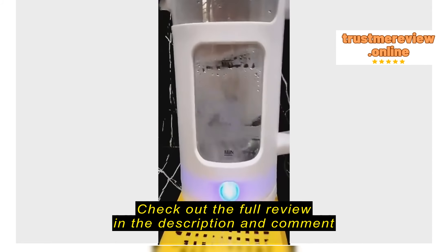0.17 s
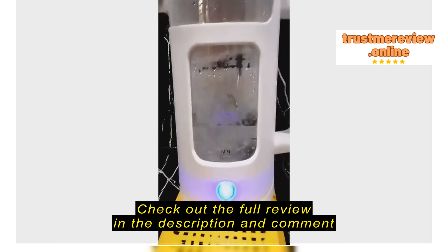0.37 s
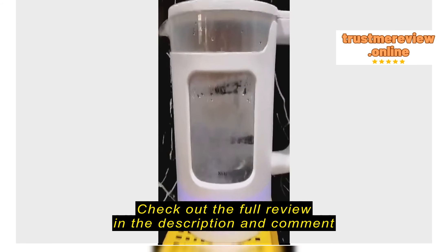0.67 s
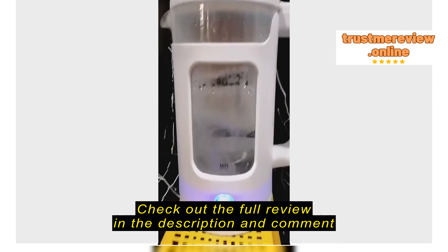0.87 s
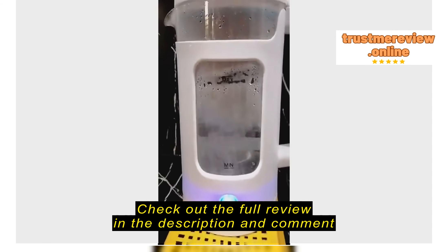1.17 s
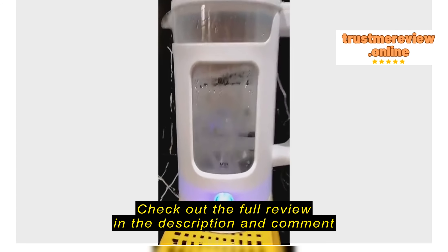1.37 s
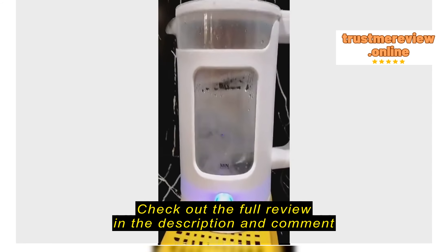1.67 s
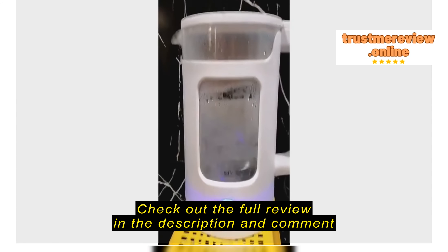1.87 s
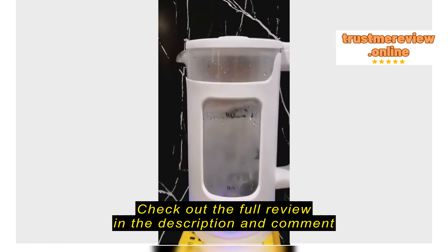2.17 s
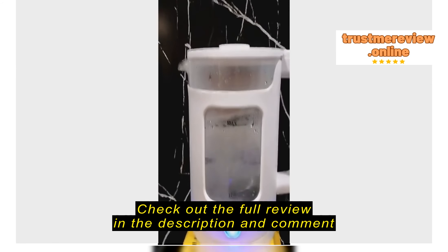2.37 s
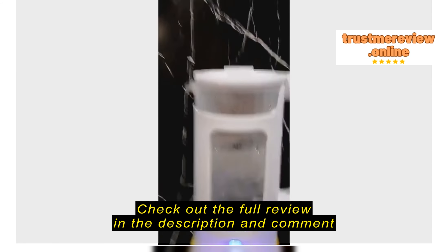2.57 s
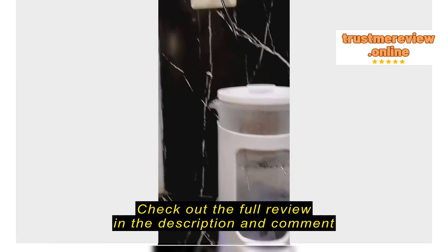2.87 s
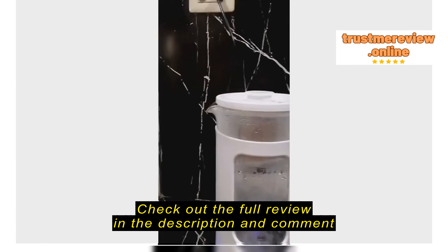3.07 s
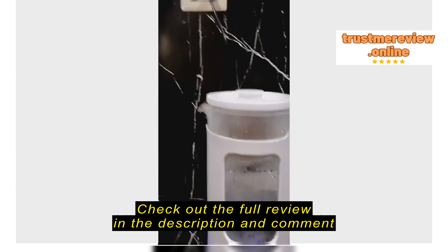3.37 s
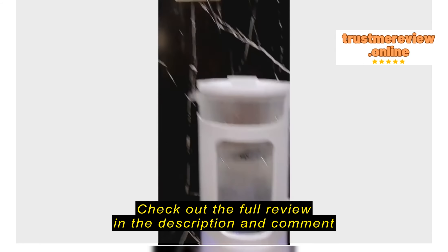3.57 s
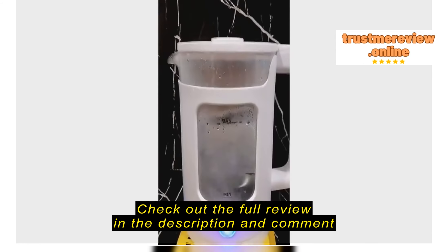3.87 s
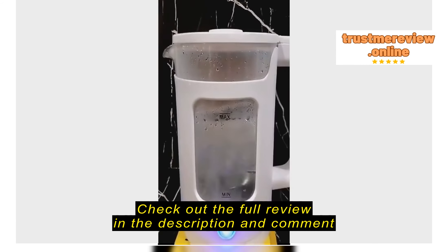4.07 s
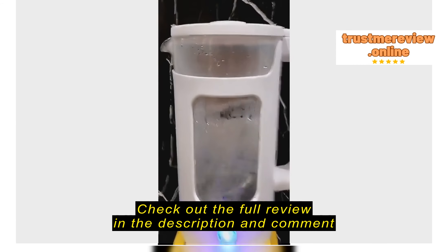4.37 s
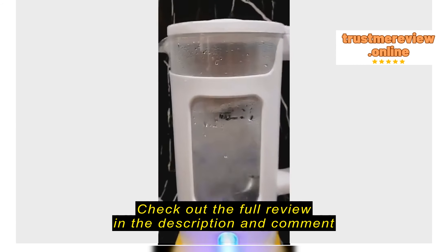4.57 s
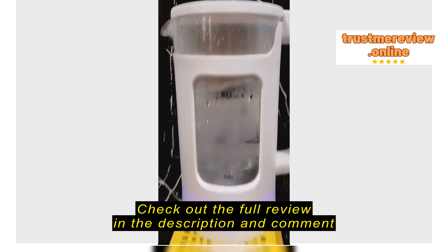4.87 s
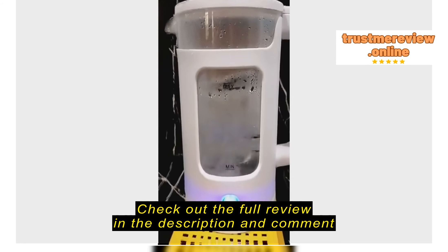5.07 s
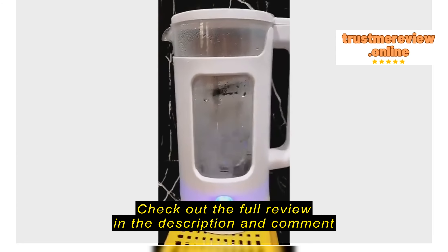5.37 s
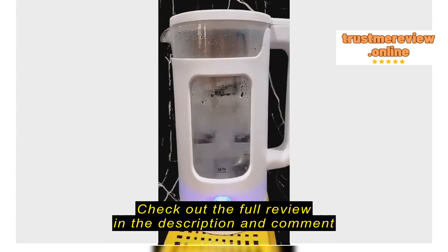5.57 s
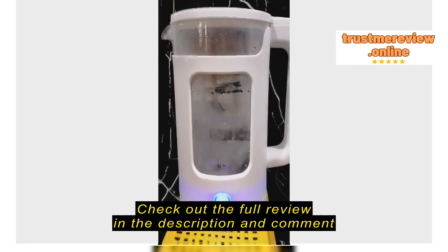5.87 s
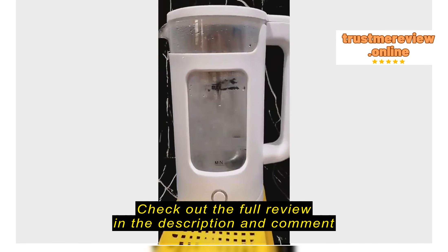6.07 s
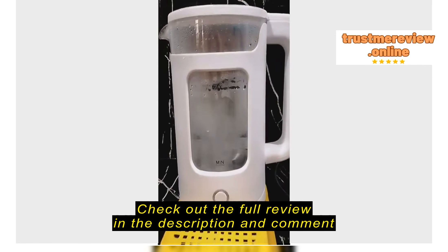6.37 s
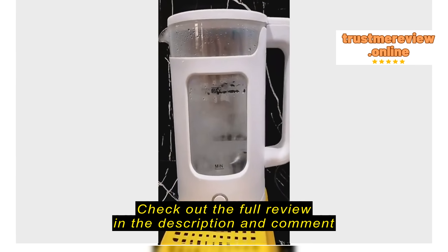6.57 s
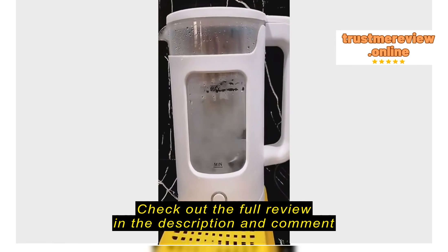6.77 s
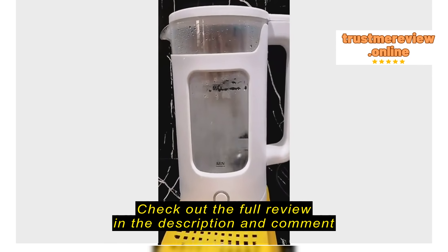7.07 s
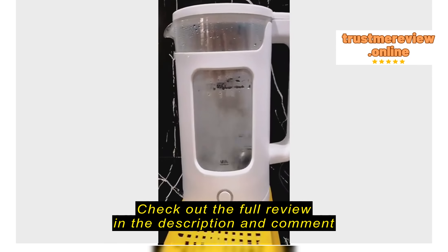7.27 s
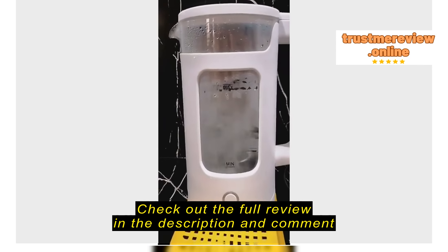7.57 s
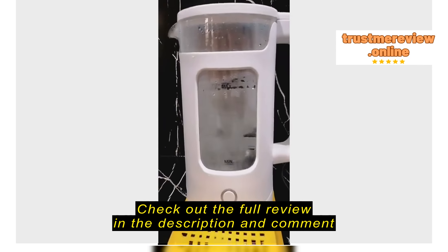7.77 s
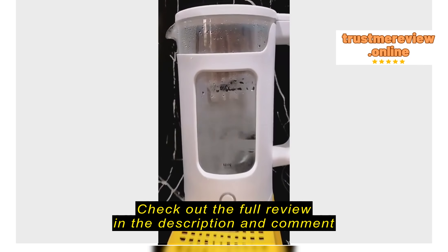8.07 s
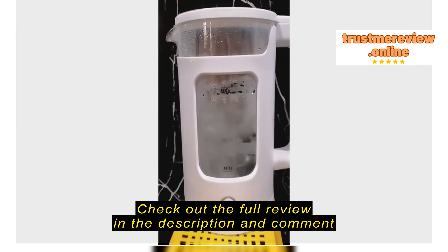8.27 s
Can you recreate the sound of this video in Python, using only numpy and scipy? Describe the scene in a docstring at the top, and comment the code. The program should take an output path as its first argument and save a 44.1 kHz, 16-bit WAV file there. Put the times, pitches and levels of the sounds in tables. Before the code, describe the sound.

An electric kettle boils close to the microphone in a small hard-walled kitchen. A low, lumpy rumble with dull watery thumps runs throughout, joined by gurgling bubbles, soft steam hiss and tiny surface pops. A faint low motor hum fades within two seconds. Near the end come a light tick and then a loud, bright switch snap with a plastic knock, springy ring and short room echo, while the boiling continues.

```python
"""A small tiled kitchen: water boils in an electric kettle, close to the two microphone ports of a camera.
From the start steam bubbles collapse on the hot plate and the filled jug rumbles; rising bubbles gurgle,
steam hisses and bubbles burst at the surface. A faint motor hum sags in pitch and is gone after two seconds.
Near the end a switch ticks, then snaps over: its housing knocks, its spring rings, and the room answers.
Random kicks and noise through resonances make most layers; short chirps make rising bubbles and faint tones."""
import sys
import numpy as np
from scipy import signal
from scipy.fft import rfft, irfft, next_fast_len
from scipy.io import wavfile
from scipy.ndimage import uniform_filter1d, map_coordinates

SR = 44100
rng = np.random.default_rng(int(sys.argv[2]) if len(sys.argv) > 2 else 0)


def store_wav(level_fs):
    """Save 16-bit WAV to argv[1]."""
    pcm = np.round(np.clip(np.atleast_2d(level_fs), -1, 1) * 32767)
    wavfile.write(sys.argv[1], SR, pcm.T.astype(np.int16))


N = 371763

# Levels in the tables are relative: each layer has its own gain in its function.
# deep noise of the room: pitch_hz, density_db (per Hz)
ROOM_NOISE = [(10, -28), (22, -11), (32, -10), (50, -6.5), (70, -5), (120, -9.5), (400, -66)]
ROOM_NOISE_DB = -58.5
# the motor running down: time_s, pitch_hz, level_db
MOTOR_HUM = [(0, 50.6, -49), (0.7, 50.3, -51.5), (1, 49.2, -51.5), (1.72, 49.1, -54.5), (2.1, 48, -100)]
# lines of the motor's hum: multiple of its pitch, level_db
HUM_LINES = [(0.5, -12), (1, 0), (1.5, -12), (2, 1)]

# decay of the kitchen: pitch_hz, t60_s
ROOM_DECAY = [(200, 0.2), (900, 0.36), (4000, 0.37), (9000, 0.34), (14000, 0.32)]
# what the kitchen's walls give back: pitch_hz, level_db
WALLS = [(850, -6), (1300, -0.5), (2400, -1), (4500, 0.5), (11500, 1), (14500, -5)]
CLATTER_DB, CLATTERS_PER_S = 2.5, 260  # unevenness of the echoes

# the rocker taking up its slack: start_s, level_db
TICKS = [(7.128, -30), (7.1305, -26.5), (7.136, -31)]
# colour of those ticks: pitch_hz, density_db (per Hz)
TICK_COLOUR = [(400, -32), (1200, -14), (3500, -13), (5500, -4), (8300, 3), (11000, -3), (15000, -9)]
# contacts of the switch: start_s, housing_knock_db, spring_db
CONTACTS = [(7.562, -30, -13), (7.5642, -5, -6), (7.5665, -24, -5), (7.5695, -30, -7), (7.5723, -24, -7)]
# plastic housing of the switch: pitch_hz, level_db
HOUSING = [(440, -12), (535, -1.5), (630, 5), (735, 4.5), (850, -0.5), (1140, -5), (1350, 1.5), (1620, 2),
           (1830, 6.5), (2330, 2), (3200, -7), (4500, -2.5), (5300, -2.5)]
# clear tones of the steel spring: pitch_hz, level_db
STEEL = [(1790, -1), (2545, -3), (3408, -2), (4170, 4), (4587, 5), (5040, 4.5), (5330, 5), (5470, 3),
         (6480, 3), (6988, -1), (8730, 5), (8890, 8), (9520, 6)]
STEEL_WIDTH_HZ = 15
# chatter of the spring and contacts: pitch_hz, density_db (per Hz)
SPRING_CHATTER = [(400, -22), (1100, -14), (1900, -10), (2400, -14), (2800, -18), (3800, -16), (4600, -11),
                  (5400, -10.5), (6000, -14), (7200, -9.5), (7800, -2.5), (8350, -3.5), (9000, 2.5),
                  (9400, 0), (9900, -5.5), (12500, -11), (15000, -27)]
PORT_LAG_S = .000155  # the strike reaches the right port this much later

# spray and steam at the surface: time_s, fizz_db
SPRAY = [(0, -52.5), (0.8, -54.5), (1.8, -55.5), (2.6, -57), (3.5, -56), (4.7, -57), (6.05, -55.5),
         (8.43, -55)]
# puffs of steam: peak_s, lift_db
PUFFS = [(0.39, 5.5), (0.45, 3), (0.75, 3.5), (1.14, 2.5), (3.335, 2), (4.84, 4.5), (5.48, 2), (6.07, 2)]
PUFF_RISE_S, PUFF_DECAY_S = 0.026, 0.06
# fizz of the surface: pitch_hz, density_db (per Hz)
FIZZ = [(530, -37), (900, -1.5), (1060, 1), (1430, -7), (2100, -4.5), (3500, -9.5), (3940, -8),
        (4490, -10.5), (7770, -11), (8960, -8), (11000, -12.5), (14400, -24), (15500, -44)]
# large bubbles bursting at the surface: start_s, film_snap_db, splash_db
POPS = [(0.7382, -33, -49), (0.9597, -40, -56), (1.0565, -41, -48), (1.1518, -42, -50), (1.9303, -39, -60),
        (2.2937, -42, -59), (2.3083, -41, -58), (2.631, -43, -55), (2.8424, -43, -56), (3.0869, -39, -56),
        (3.1782, -44, -57), (3.4999, -43, -51), (3.5095, -45, -50), (3.674, -38, -58), (4.1076, -39, -49),
        (4.4169, -38, -56), (5.0749, -45, -53), (5.1557, -42, -55), (5.3358, -37, -54), (5.4302, -44, -53),
        (5.4801, -47, -50), (5.8686, -47, -54), (6.0115, -42, -50), (6.3729, -37, -50), (6.4635, -44, -49),
        (6.4862, -40, -53), (6.7401, -43, -50), (6.9022, -41, -54), (7.3609, -40, -52), (8.0312, -44, -52),
        (8.1604, -43, -53)]
# the snap of the film: pitch_hz, density_db (per Hz)
SNAP_COLOUR = [(800, -30), (3000, -16), (5000, -10), (7000, -6), (9500, 3), (14000, -15)]
# the splash of a burst: pitch_hz, density_db (per Hz)
SPLASH_COLOUR = [(500, -25), (1200, -1), (2500, 1), (4500, -0.5), (8000, -13)]

# churning under the surface: pitch_hz, density_db (per Hz)
CHURN = [(60, -59), (110, -2), (300, 6), (500, -11), (800, -8.5), (950, -23), (1400, -40), (3000, -36.5)]
# bubbles gulping as they break loose: start_s, level_db
GLUGS = [(2.08, -39), (2.241, -38), (2.289, -30), (3.382, -26.5), (4.07, -41), (4.108, -33), (4.593, -31),
         (5.869, -28), (6.215, -20.5)]
# air space over the water: pitch_hz, width_hz, level_db
CAVITY = [(540, 38, -12.5), (695, 61, -7), (780, 55, -5.5)]

# the filled jug: pitch_hz, width_hz, level_db
JUG = [(116, 40.4, -9.5), (150.8, 18.9, -4), (174.8, 12.1, -5), (188.4, 13.6, -4), (279.4, 23.1, -3),
       (345.8, 39.7, -10), (437, 30, -17), (567, 71, -25), (668, 120, -22.5), (784.7, 62.5, -19)]
# large steam bubbles collapsing: start_s, level_db, pitch_hz
THUMPS = [(0.058, -23, 266), (0.172, -26.5, 289), (0.299, -27, 288), (0.373, -21, 284), (0.727, -26.5, 279),
          (0.856, -22.5, 275), (0.955, -30.5, 306), (1.08, -24.5, 287), (1.259, -28, 287),
          (1.542, -26.5, 280), (1.668, -26.5, 287), (1.769, -28.5, 288.3), (1.961, -28, 252),
          (2.096, -25.5, 278), (2.762, -24, 276), (3.204, -22, 280), (3.325, -23, 282), (3.752, -25.5, 284),
          (4.652, -29, 286), (4.823, -20.5, 282), (4.951, -27, 283), (5.171, -25, 278), (5.235, -25.5, 288),
          (5.702, -26, 278), (5.96, -27, 270), (6.061, -26.5, 292), (6.203, -28.5, 283), (6.31, -26.5, 287),
          (6.561, -32, 279), (6.697, -30, 291), (6.782, -29.5, 299), (6.932, -31.5, 275),
          (7.466, -25.5, 275), (7.951, -26.5, 281), (8.184, -33, 304)]
THUMP_RISE_S = 0.011  # time for the water column's swing to grow to its peak
# sudden implosions right on the hot plate: start_s, level_db
KNOCKS = [(0.373, -24), (1.827, -25), (5.124, -35), (6.578, -35), (7.036, -18), (7.670, -18.5)]
# the dull knock of such an implosion: pitch_hz, width_hz, level_db
KNOCK_MODES = [(160, 45, -14), (272, 27, -6), (350, 120, -23)]
# water cushions the knock: pitch_hz, level_db
CUSHION = [(330, 0), (470, -7), (700, -18), (1400, -45)]
BOIL_DB, BOIL_EASE_DB_PER_S = -36.5, 0.0841  # drive at the start, and how fast it eases
LUMP_DB, LUMPS_PER_S = 1.15, 20  # chance swells of the boil
SURGE_DB, SURGE_RISE_S, SURGE_DECAY_S = 1.5, 0.013, 0.1  # stir around each large collapse

# likeness of the ports: pitch_hz, correlation (clipped to -1..1)
PORT_LIKENESS = [(120, 4.5), (280, 0.8), (600, 0.5), (1100, 0.16), (2000, -0.16), (4000, 0), (9000, 0)]
# balance of the ports: pitch_hz, left_minus_right_db
PORT_BALANCE = [(55, 0), (130, 1.5), (200, 1.8), (280, 3.2), (350, 5.5), (430, 1.5), (560, 4.5), (740, 6),
                (1200, 2), (2000, 3), (3300, 0), (5500, 3), (8700, 3), (10500, -1.5), (15000, -1.5)]
TOP_HZ = 15650  # nothing is kept above this


def amp(db):
    """Decibels to gain."""
    return 10 ** (np.asarray(db) / 20)


def unit(x):
    """Scale to rms 1."""
    return x / np.sqrt(np.mean(x ** 2) + 1e-20)


def along(points, hz):
    """Read (Hz, value) points on a log frequency axis."""
    f, v = np.transpose(points)
    return np.interp(np.log(hz + 1), np.log(f), v)


def curve(rows):
    """(s, value) rows as one value per sample."""
    return np.interp(np.arange(N) / SR, *np.transpose(rows))


def wobble(rate):
    """A smooth random curve, rate knots a second."""
    knots = rng.standard_normal(int(N * rate / SR) + 4)
    return map_coordinates(knots, [np.arange(N) * rate / SR])


def filtered(x, response):
    """x times a complex response of frequency."""
    m = next_fast_len(x.shape[-1] + SR // 2)  # half a second of room for ringing
    spectrum = rfft(x, m) * response(np.fft.rfftfreq(m, 1 / SR))
    return irfft(spectrum, m)[..., :x.shape[-1]]


def coloured(x, spectrum):
    """x with a (Hz, dB) spectrum laid on it."""
    return filtered(x, lambda hz: amp(along(spectrum, hz)))


def ring(x, modes, turn=-1):
    """x through (Hz, width, dB) resonances; turn=1 starts all in step, for a hard attack."""
    def response(f):
        total = 0
        for k, (centre, width, db) in enumerate(modes):
            damping = 1j * f * width
            total = total + turn ** k * amp(db) * damping / (centre * centre - f * f + damping)
        return total
    return filtered(x, response)


def spread(pair):
    """Two unrelated signals as left and right: alike in the bass, apart in the treble."""
    def mid_side(hz):
        angle = np.arccos(np.clip(along(PORT_LIKENESS, hz), -1, 1)) / 2
        return np.array([np.cos(angle), np.sin(angle)])
    mid, side = filtered(pair, mid_side)
    return np.array([mid + side, mid - side])


def add(track, s, sound):
    """Mix a sound into a track at time s."""
    part = track[..., round(s * SR):][..., :sound.shape[-1]]
    part += sound[..., :part.shape[-1]]


def kicks(rate, scatter_db):
    """Two trains of random impulses, rate a second, of uneven size and either sign."""
    hit = rng.random((2, N)) < rate / SR
    sign = np.sign(rng.standard_normal((2, N)))
    return hit * sign * amp(scatter_db * np.clip(rng.standard_normal((2, N)), -2, 2))


def blows(rows):
    """One impulse for every (s, dB) row."""
    out = np.zeros(N)
    for s, db in rows:
        add(out, s, amp([db]))
    return out


def bursts(rows, t60):
    """A short dying crackle of noise at each port for every (s, dB) row."""
    out, t = np.zeros((2, N)), np.arange(SR // 10) / SR
    for s, db in rows:
        add(out, s, amp(db - 60 * t / t60) * rng.standard_normal((2, len(t))))
    return out


def scattered(count, top_db, range_db):
    """(s, dB) rows at random moments, of uneven strength."""
    return [(when * (N - 1) / SR, top_db - range_db * size) for when, size in rng.random((count, 2))]


def swells(peak_times, rise_s, decay_s):
    """One envelope per time: a quick rise that reaches 1 at that time, then an exponential decay."""
    age = np.arange(N) / SR - np.array(peak_times)[:, None]
    return np.clip(1 + age / rise_s, 0, 1) * np.exp(-np.maximum(age, 0) / decay_s)


def patchy(depth_db):
    """Stereo noise whose gain drifts in small patches of time and frequency."""
    z = signal.stft(rng.standard_normal((2, N)), nperseg=512)[2]
    field = uniform_filter1d(rng.standard_normal(z.shape[1:]), size=7, axis=0)
    field = uniform_filter1d(field, size=6, axis=1)
    return signal.istft(z * amp(depth_db * unit(field)), nperseg=512)[1][:, :N]


def chirps(count, low_hz, span, cycles, range_db, glide):
    """Short tones die within a few cycles at random times, each gliding up in pitch."""
    when, port, pitch, size = rng.random((count, 4)).T[..., None]
    step = np.arange(int(2 * cycles / low_hz * SR))
    turns = low_hz * span ** pitch * step / SR
    age = turns / cycles
    tone = np.sin(2 * np.pi * turns * (1 + glide * np.minimum(age, 2)))
    dying = tone * (1 - np.exp(-turns)) * amp(-30 * age - range_db * size)
    # late chirps wrap round to the start; both ports lie end to end in one index
    index = (port * 2).astype(int) * N + ((when * N).astype(int) + step) % N
    return unit(np.bincount(index.ravel(), dying.ravel(), 2 * N).reshape(2, N))


def in_room(x, wet_db):
    """x with the kitchen's tail: shaped noise in which each frequency dies at its own speed."""
    hz, t, z = signal.stft(rng.standard_normal((2, SR // 2)), SR, nperseg=256)
    fall_db = along(WALLS, hz)[:, None] - 60 * t / along(ROOM_DECAY, hz)[:, None]
    tail = signal.istft(z * amp(fall_db), SR, nperseg=256)[1]
    # the first walls answer within a few ms
    tail = tail * np.clip(np.arange(tail.shape[1]) / SR / 0.0044, 0, 1)
    # hard tiles send it back in uneven clusters
    tail = tail * amp(CLATTER_DB * wobble(CLATTERS_PER_S)[:tail.shape[1]])
    wet = signal.fftconvolve(x, tail / np.linalg.norm(tail[0]), axes=1)[:, :N]
    return x + amp(wet_db) * wet


def room_noise():
    """The room's deep, steady noise: random noise held to the bass."""
    return amp(ROOM_NOISE_DB) * unit(coloured(rng.standard_normal(N), ROOM_NOISE))


def motor_hum():
    """A motor's hum: sine lines locked to one pitch that sags a little and stops."""
    pitch_hz = curve([(s, hz) for s, hz, _ in MOTOR_HUM])
    level_db = curve([(s, db) for s, _, db in MOTOR_HUM])
    turns = np.cumsum(pitch_hz) / SR
    lines = sum(amp(db) * np.sin(2 * np.pi * k * turns) for k, db in HUM_LINES)
    return amp(level_db) * lines


def switch():
    """The rocker ticks and tips; contact blows ring housing and steel while the spring chatters."""
    knocks = blows([(s, db) for s, db, _ in CONTACTS])
    strike = filtered(knocks, lambda hz: np.exp(-2j * np.pi * np.outer([0, PORT_LAG_S], hz)))
    # plastic loses the same share in every cycle, so width grows with pitch
    plastic_modes = [(hz, .075 * hz, db) for hz, db in HOUSING]
    housing = amp(25) * ring(strike, plastic_modes, turn=1)
    # the housing gives little below about 470 Hz
    little_bass = signal.butter(4, 470, "highpass", fs=SR, output="sos")
    housing = signal.sosfilt(little_bass, housing)
    steel = amp(25) * ring(strike, [(hz, STEEL_WIDTH_HZ, db) for hz, db in STEEL])
    chatter = bursts([(s, db) for s, _, db in CONTACTS], t60=0.035)
    spring = amp(5.5) * coloured(chatter, SPRING_CHATTER)
    ticks = coloured(bursts(TICKS, t60=0.02), TICK_COLOUR)
    return steel + in_room(housing, wet_db=-6.5) + in_room(spring, wet_db=-4.2) + in_room(ticks, wet_db=-8)


def spray():
    """How loud the surface fizz is, as a gain: a slow drift in level, lifted by puffs of steam."""
    peak_times, lift_db = np.transpose(PUFFS)
    return amp(curve(SPRAY) + lift_db @ swells(peak_times, PUFF_RISE_S, PUFF_DECAY_S))


def fizz():
    """Steam hisses as patchy noise, with fine crackle as impulses and short faint tones from 1 to 6 kHz."""
    # two layers of hiss, one a little brighter, swell on their own, then together
    hiss = coloured(patchy(depth_db=3.5), [(3500, -3.5), (8000, -0.5)]) * amp(2.0 * wobble(45))
    brighter = coloured(patchy(depth_db=4.0), [(3000, -8.5), (7000, -2.0)]) * amp(2.6 * wobble(40))
    steam = unit(coloured(hiss + brighter, FIZZ)) * amp(1.0 * wobble(90))
    crackle = unit(in_room(coloured(kicks(rate=260, scatter_db=3.5), FIZZ), wet_db=0))
    faint_tones = chirps(count=2600, low_hz=995, span=6.36, cycles=18.0, range_db=6, glide=.05)
    longer_tones = chirps(count=260, low_hz=1220, span=4.52, cycles=38, range_db=9.5, glide=0.094)
    surface = amp(0.2) * steam + amp(-2) * crackle + amp(-12) * faint_tones + amp(-14.5) * longer_tones
    return spray() * spread(surface)


def surface_pops():
    """Bubbles burst at the surface: a bright snap of the film and a duller splash, both brief noise."""
    weak = scattered(count=120, top_db=-46, range_db=7)
    snaps = amp(4) * bursts([(s, db) for s, db, _ in POPS] + weak, t60=.016)
    spits = scattered(count=110, top_db=-53.5, range_db=7)
    splashes = amp(10.5) * bursts([(s, db) for s, _, db in POPS] + spits, t60=0.026)
    pops = in_room(coloured(snaps, SNAP_COLOUR) + coloured(splashes, SPLASH_COLOUR), wet_db=-5.0)
    return pops * amp([[-1.5], [1]])  # left, right dB


def boil():
    """How hard the water rolls, as a gain: it eases slowly, in lumps, and surges at each large collapse."""
    surge = swells([s for s, _, _ in THUMPS], SURGE_RISE_S, SURGE_DECAY_S).max(axis=0)
    easing_db = BOIL_DB - BOIL_EASE_DB_PER_S * np.arange(N) / SR
    return amp(easing_db + LUMP_DB * wobble(LUMPS_PER_S) + SURGE_DB * surge)


def gurgle(rolling):
    """Rising bubbles ring over a churning bed; the biggest gulp in the air space of the jug."""
    rising = chirps(count=900, low_hz=398.0, span=2.205, cycles=9.5, range_db=3.5, glide=0.027)
    bed = unit(coloured(kicks(rate=900, scatter_db=6), CHURN))
    gulps = amp(36.5) * ring(blows(GLUGS), CAVITY)
    return rolling * spread(amp(-22.0) * rising + amp(-9.5) * bed) + gulps


def rumble(rolling):
    """Collapsing steam bubbles kick the jug; large ones swing the water column, sudden ones knock."""
    jug = unit(spread(ring(kicks(rate=900, scatter_db=2.5), JUG)))
    roll = amp(-3.0) * rolling * jug
    t, swings = np.arange(SR // 6) / SR, np.zeros(N)
    swing = t / THUMP_RISE_S * np.exp(1 - t / THUMP_RISE_S)
    for s, db, hz in THUMPS:
        add(swings, s, amp(db) * swing * np.sin(2 * np.pi * hz * t))
    knocks = amp(50.0) * ring(blows(KNOCKS), KNOCK_MODES, turn=0.8)
    return roll + amp(-5.0) * swings + coloured(knocks, CUSHION)


def scene():
    """One boil drives rumble and gurgle; the kettle stands nearer the left port."""
    rolling = boil()
    background = room_noise() + motor_hum()
    surface = fizz() + surface_pops()
    kitchen = background + switch() + surface + gurgle(rolling) + rumble(rolling)
    # half the difference goes to each port
    return filtered(kitchen, lambda hz: amp(np.outer([.5, -.5], along(PORT_BALANCE, hz))))


def record(dry):
    """The camera rounds off peaks near full scale and keeps nothing above its band limit."""
    held = dry / (1 + (dry / .9) ** 6) ** (1 / 6)
    # a 500 Hz wide slope ends at the limit
    return filtered(held, lambda hz: np.clip((TOP_HZ - hz) / 500, 0, 1))


dry = scene()
out = record(dry)
store_wav(out)
```